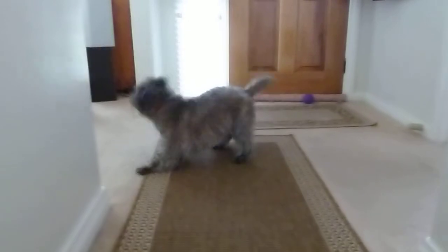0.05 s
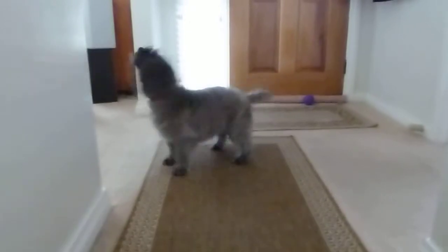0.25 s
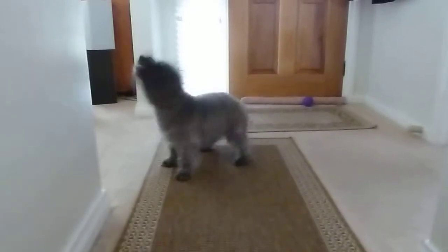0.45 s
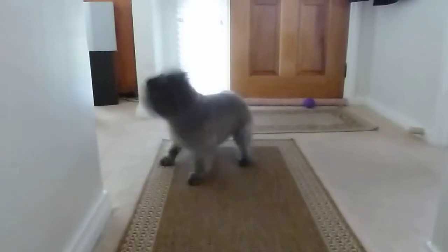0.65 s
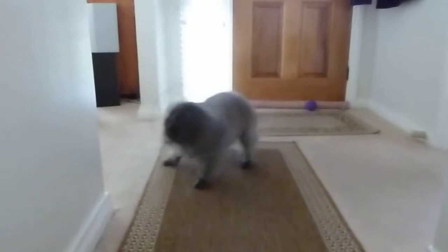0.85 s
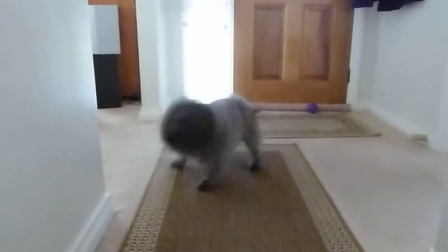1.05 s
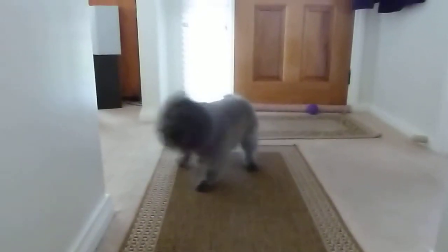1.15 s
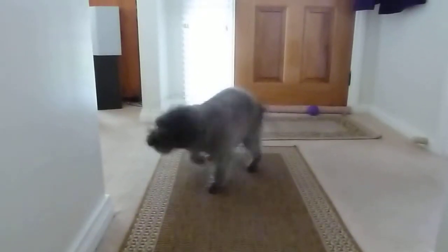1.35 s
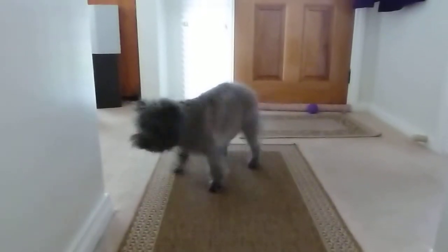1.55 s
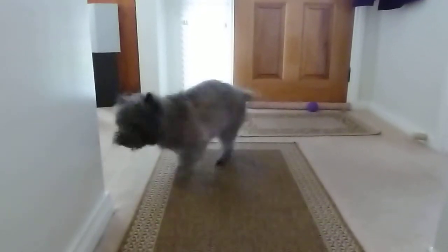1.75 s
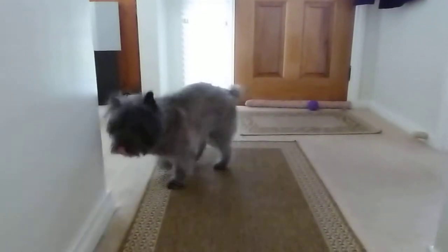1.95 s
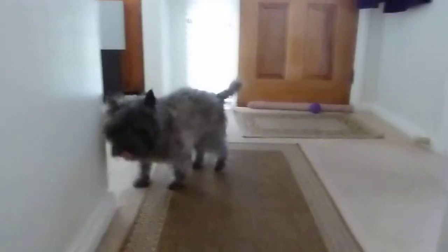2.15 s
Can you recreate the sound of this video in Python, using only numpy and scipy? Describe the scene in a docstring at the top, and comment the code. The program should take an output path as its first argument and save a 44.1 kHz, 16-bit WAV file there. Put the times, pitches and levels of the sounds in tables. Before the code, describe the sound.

A small dog shakes itself, its ears slapping in a quick, even run of sharp clicks over swishing fur. The shake dies into a few soft steps and low floor thuds, with a short echo in a quiet hallway.

```python
"""A small dog shakes itself

On a rug in a quiet hallway, an ear slaps the dog's head about six times a second, with lighter
flicks on the back swings. The coat swishes, loose skin and paws flop and the floor thuds.
The shake dies into a few steps. Near walls answer with a short echo."""
import sys
import numpy as np
from scipy import signal
from scipy.fft import rfft, irfft, next_fast_len
from scipy.io import wavfile
from scipy.ndimage import map_coordinates

SR = 44100
rng = np.random.default_rng(int(sys.argv[2]) if len(sys.argv) > 2 else 0)


def transcribe(signal):
    """Save signal, clipped to [-1, 1], as a 16-bit WAV file at the path in sys.argv[1]."""
    frames = np.atleast_2d(signal).T
    limited = np.clip(frames, -1, 1)
    pcm = np.round(limited * 32767).astype(np.int16)
    wavfile.write(sys.argv[1], SR, pcm)


N = 97020  # 2.2 seconds


def amp(db):
    """Turn decibels into a number to multiply by."""
    return 10 ** (np.asarray(db) / 20)


def unit_energy(x):
    """Scale each channel to an energy of 1."""
    return x / np.linalg.norm(x, axis=-1, keepdims=True)


def along(points, hz):
    """Read between (frequency, value) points, with octaves evenly spaced."""
    f, v = np.transpose(points)
    return np.interp(np.log(hz + 1), np.log(f + 1), v)


def seconds(length):
    """The time of each sample."""
    return np.arange(int(length * SR)) / SR


def wobble(rate, limit):
    """A smooth random curve within +/- limit, through rate points a second."""
    points = rng.standard_normal(int(N * rate / SR) + 4)
    curve = map_coordinates(points, [np.arange(N) * rate / SR])
    return limit * np.tanh(curve / limit)


def resonance(f, hz, q):
    """A filter that peaks at hz; a higher q rings longer."""
    return 1j * f * hz / q / (hz * hz - f * f + 1j * f * hz / q)


def filtered(x, response):
    """Multiply each frequency in x by response(frequency)."""
    n = x.shape[-1]
    size = 2 * next_fast_len(n // 2 + 4096)
    return irfft(rfft(x, size) * response(np.fft.rfftfreq(size, 1 / SR)), size)[..., :n]


def coloured(x, points):
    """Shape the tone of x with (frequency [Hz], level [dB]) points."""
    def response(hz):
        cepstrum = irfft(np.log(amp(along(points, hz))))
        half = len(cepstrum) // 2
        cepstrum[1:half] *= 2  # folded so that nothing rings before the sound starts
        cepstrum[half + 1:] = 0
        return np.exp(rfft(cepstrum))
    return filtered(x, response)


def stereo(pair):
    """Blend two unrelated noises into sound arriving from all around."""
    # (frequency [Hz], how alike left and right are [0 to 1])
    alike = [(100, 0.95), (400, 0.94), (1000, 0.72), (2500, 0.43), (5000, 0.35), (8000, 0.77)]
    def blend(hz):
        angle = np.arccos(along(alike, hz)) / 2
        return np.array([np.cos(angle), np.sin(angle)])
    mid, side = filtered(pair, blend)
    return np.array([mid + side, mid - side])


def burst(fade, rise):
    """A puff of noise, even in tone; fade is the time in seconds to die away by 60 dB."""
    t = seconds(.25)
    envelope = amp(-60 * t / fade) * (1 - np.exp(-t / rise))
    spectrum = rfft(rng.standard_normal(len(t)) * envelope)
    return irfft(spectrum / (abs(spectrum) + 1e-12), len(t)) * (t < fade)


def rush(tone):
    """Steady stereo noise with an average (rms) level of 1."""
    noise = stereo(coloured(rng.standard_normal((2, N)), tone))
    return noise / np.sqrt(np.mean(noise ** 2))


def room_air():
    """Still air makes a faint, steady hush."""
    # tone of the hush (frequency [Hz], level [dB])
    tone = [(15, -64), (25, -23), (162, -3.5), (659, -3), (727, -4.5), (2140, -15), (3340, -17.5),
            (4170, -22), (6810, -19.5), (8930, -52), (11600, -77), (19600, -120)]
    return amp(-52.5) * rush(tone)


def standing_waves(f):
    """The narrow hallway rings on at a few low frequencies."""
    # notes trapped between the walls (frequency [Hz], level [dB])
    notes = [(190, -0.5), (258, -1), (370, -2), (475, 0), (613, -11.5), (702, -4.5)]
    width_hz = 7.8
    return 1 + sum(amp(db) * resonance(f, hz, hz / width_hz) for hz, db in notes)


def hallway():
    """How a click is heard here: direct, then off the near walls, with a fading echo."""
    # how long the echo lasts (frequency [Hz], fade time [s])
    fades = [(100, 0.47), (500, 0.28), (1500, .36), (3000, 0.39), (7000, 0.33)]
    build_s, wall_delay_s, wall_fade_s = .00067, .0098, .088
    t = seconds(0.42)
    hz, frame_s, noise = signal.stft(rng.standard_normal((2, len(t))), SR, nperseg=256)
    fading = noise * amp(-60 * frame_s / along(fades, hz)[:, None])
    tail = signal.istft(fading)[1][:, :len(t)]
    tail = unit_energy(tail * (1 - np.exp(-t / build_s)))
    walls = rng.standard_normal((2, len(t))) * (t > wall_delay_s) * amp(-60 * t / wall_fade_s)
    response = stereo(amp(-0.5) * tail + amp(-3) * unit_energy(walls))
    response[:, 0] += 1  # the direct sound
    return response


def play_in_hall(out, s, db, sound):
    """Add a sound to out at time s, with its energy set by db and its own echo."""
    start = round(s * SR)
    sound = amp(db) * unit_energy(sound)
    heard = signal.fftconvolve(sound[None], hallway(), axes=1)[:, :N - start]
    out[:, start:start + heard.shape[1]] += heard


def rustle():
    """The coat swishes and the body shuffles on the rug, louder as the dog shakes harder."""
    # strength of the shake (time [s], level [dB])
    effort = [(0, 1.5), (.08, -10), (.17, -9.5), (.3, -7), (.6, -0.5), (.85, -3.5), (1.199, 2), (1.5, -0.5),
              (1.8, -1), (1.95, -9), (2.2, -15.5)]
    # tones of the swish and the shuffle (frequency [Hz], level [dB])
    coat_tone = [(150, -1), (400, -5.5), (1200, 4), (3200, 6), (6500, 1), (9000, -20)]
    body_tone = [(25, -23), (55, -5.5), (105, -2.5), (160, -14.5), (270, -5.5), (500, -10), (1000, -18),
                 (3000, -39.5)]
    effort_db = np.interp(np.arange(N) / SR, *np.transpose(effort))
    coat = amp(-46.5 + effort_db + 3.5 * wobble(rate=24.05, limit=1.2)) * rush(coat_tone)
    body = amp(-47 + effort_db + 2.5 * wobble(rate=24.05, limit=1.2)) * rush(body_tone)
    return coat + body


def floor_thuds():
    """The dog's shifting weight rings the floor, heard alike left and right."""
    # weight landing (time [s], level [dB])
    landings = [(0.376, -2), (.415, -10), (0.479, -7.5), (0.566, -8), (0.7955, -4), (0.8824, 9), (.905, 6),
                (1.2634, 2.5), (1.4044, 2.5), (1.485, -4.5), (1.5442, 1.5), (1.626, -4.5), (1.684, -0.5),
                (1.7363, 5.5), (1.767, -0.5), (1.809, 0), (1.861, -11.5), (1.969, -16.5)]
    # the floor's own notes (frequency [Hz], level [dB], fade time [s])
    boards = [(56, -12.5, 0.17), (85.2, -10, 0.22), (109.6, 3.5, 0.13), (138, -3, 0.049)]
    rise_s = .0098
    out = np.zeros(N)
    for s, db in landings:
        t = np.maximum(np.arange(N) / SR - s, 0)
        ring = sum(amp(level - 60 * t / fade) * np.sin(2 * np.pi * (hz * t + rng.random() / 4))
                   for hz, level, fade in boards)
        out += amp(db - 33.5) * ring * (1 - np.exp(-t / rise_s))
    return out


def skin_flops():
    """Loose skin and paws land softly, each a dull puff with a vague pitch."""
    # soft contacts (time [s], level [dB], pitch [Hz], fade time [s])
    flops = [(.005, -9.5, 650, .13), (.239, -3.5, 606, .08), (.319, -9, 420, 0.03), (.371, -5.5, 480, .05),
             (.402, -8, 423, 0.028), (.4654, -7, 506, 0.03), (.5542, -9, 470, 0.036),
             (.65, -11.5, 686, .08), (.8745, -0.5, 410, 0.03), (.903, -3.5, 400, .1),
             (1.0446, -1, 430, 0.049), (1.1848, -3.5, 535, 0.15), (1.2292, -4.5, 600, 0.037),
             (1.325, -3.5, 520, .1), (1.4911, -6.5, 380, 0.035), (1.55, -10.5, 270, 0.051),
             (1.5799, -3, 580, 0.053), (1.7201, -2.5, 353, 0.046), (1.762, -5.5, 1280, .1),
             (1.80, -4, 383, 0.094), (1.843, -2.5, 517, 0.073), (1.8957, -3, 677, 0.063),
             (1.905, -5, 243, 0.067), (2.0299, -9.5, 740, 0.029)]
    # tone of a flop (frequency [Hz], level [dB])
    tone = [(40, -9), (150, 0.5), (700, -2), (1400, -1), (2200, -10), (5000, -3)]
    out = np.zeros((2, N))
    for s, db, hz, fade in flops:
        puff = filtered(burst(fade, rise=.0021), lambda f: resonance(f, hz, q=2))
        play_in_hall(out, s, db - 6, coloured(puff, tone))
    return out


def light_flicks():
    """Ear tips and claws make small, bright ticks that ring a little."""
    # light contacts (time [s], level [dB], pitch [Hz], fade time [s])
    flicks = [(.002, -21, 2750, 0.065), (.155, -22.5, 2960, 0.15), (0.291, -6.5, 5140, 0.053),
              (.373, -30, 3000, 0.026), (.470, -10.5, 5540, 0.16), (0.558, -10.5, 3200, 0.06),
              (.645, -20, 5500, .05), (.801, -12.5, 5900, 0.0082), (.898, -10, 5900, 0.0092),
              (.9025, -11.5, 3240, 0.059), (0.9637, -14, 5800, .05), (1.0647, -7, 5600, 0.03),
              (1.156, -15.5, 3400, 0.0047), (1.3205, -16, 3160, .008), (1.5546, -17, 3800, .008),
              (1.63, -20.5, 4350, 0.048), (1.645, -15.5, 3350, 0.053), (1.754, -19.5, 2480, 0.037),
              (1.7988, -15, 3480, 0.037), (2.0324, -42, 3480, 0.016), (2.0934, -29, 3400, 0.0069)]
    # tone of a flick (frequency [Hz], level [dB])
    tone = [(200, -26.5), (1200, -7), (2200, -2), (3300, 1), (4500, -4), (6200, -2.5), (9000, -8)]
    out = np.zeros((2, N))
    for s, db, hz, fade in flicks:
        brush = burst(fade, rise=0.035 * fade)  # longer flicks start more softly
        flick = filtered(brush, lambda f: 1 + amp(4) * resonance(f, hz, q=6))
        play_in_hall(out, s, db + 4, coloured(flick, tone))
    return out


def ear_slaps():
    """Each slap is a sharp crack that pops the air trapped under the ear."""
    # ear hits (time [s], level [dB], pop pitch [Hz], pop over the crack [dB], treble tilt [dB])
    slaps = [(0.2041, 1, 3100, 7.5, -1), (0.3864, 1, 2900, -4.5, -2.5), (0.5625, 0.15, 3020, 8, -0.5),
             (0.7316, 0.1, 2970, 8, 2.5), (1.0669, -3.7, 3570, 6, 3.5), (1.2327, -1, 3470, 10.5, 1),
             (1.3909, -1, 2590, 6, 2)]
    # tone of the crack (frequency [Hz], level [dB])
    tone = [(100, -26), (400, -18), (1000, -11.5), (1800, -1.5), (3300, 2.5), (4100, -3.5), (6000, 1.5),
            (7300, -5), (9000, -8)]
    pop_fade_s, tilt_centre_hz = .003, 3400
    out = np.zeros((2, N))
    for s, db, hz, pop_db, tilt_db in slaps:
        crack = coloured(burst(fade=.009, rise=1 / SR), tone)
        q = np.pi * hz * pop_fade_s / np.log(1000)
        pop = lambda f: 1 + amp(pop_db) * resonance(f, hz, q)
        tilt = lambda f: amp(tilt_db * np.tanh(2 * (f / tilt_centre_hz - 1)))
        play_in_hall(out, s, db + 8, filtered(crack, lambda f: pop(f) * tilt(f)))
    return out


def scene():
    """The dog, a touch to the right, over still room air."""
    dog = ear_slaps() + light_flicks() + skin_flops() + floor_thuds() + rustle()
    balance = amp([[-0.08], [0.08]])  # left, right
    return filtered(dog, standing_waves) * balance + room_air()


def record(dry):
    """A small microphone that misses the highest treble."""
    # what it picks up (frequency [Hz], level [dB])
    mic_tone = [(20, -19.5), (50, 0.5), (6800, -1), (7500, -4.5), (8000, -24), (8500, -18.5), (9200, -41.5)]
    return filtered(coloured(dry, mic_tone), lambda hz: hz < 9300)


dry = scene()
out = record(dry)
transcribe(out)
```